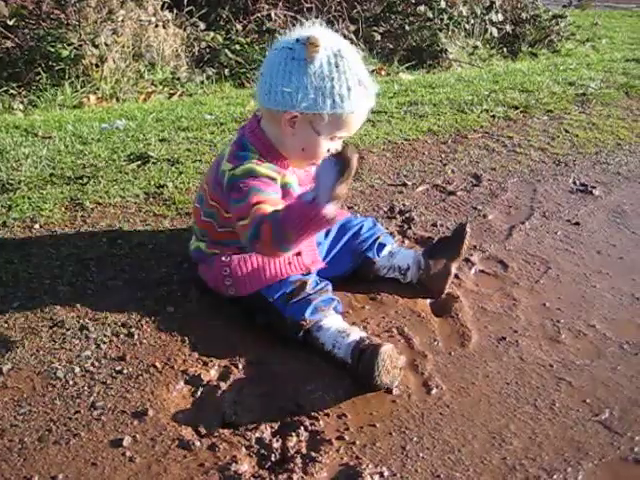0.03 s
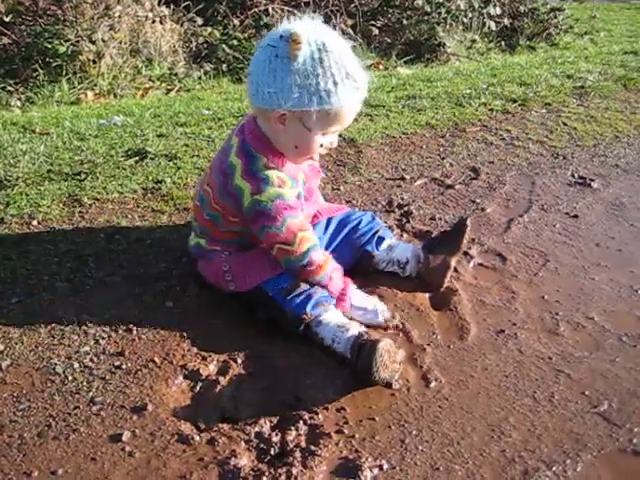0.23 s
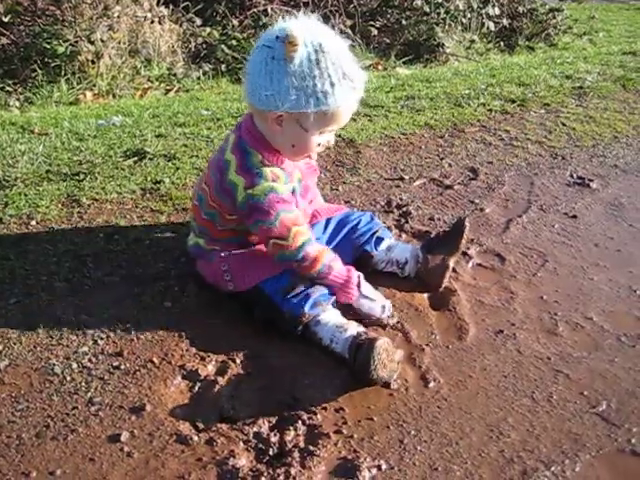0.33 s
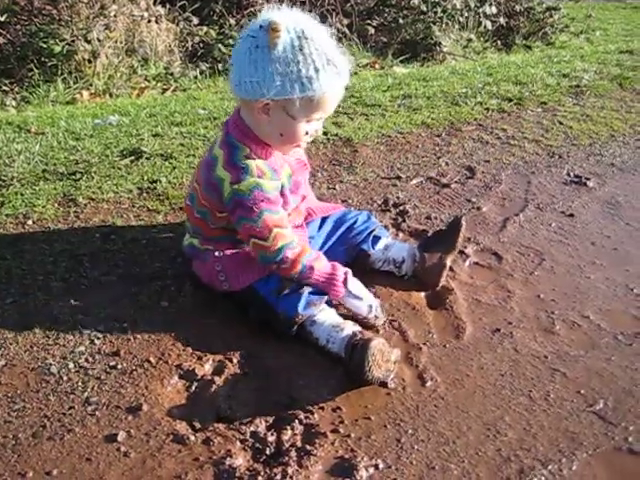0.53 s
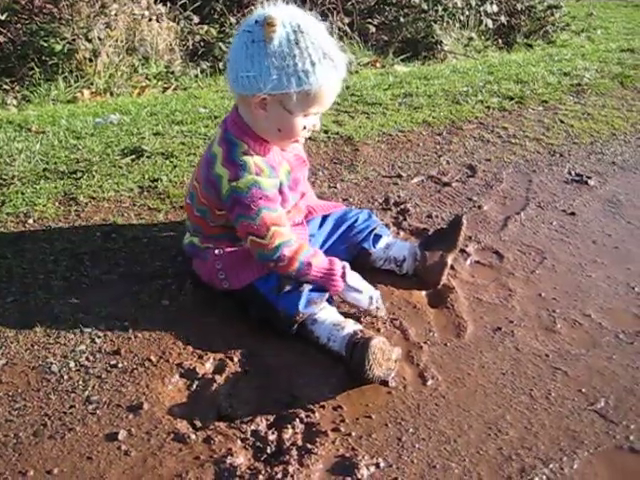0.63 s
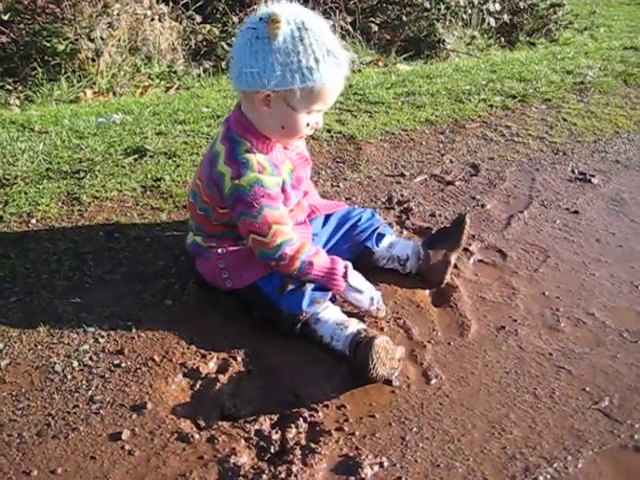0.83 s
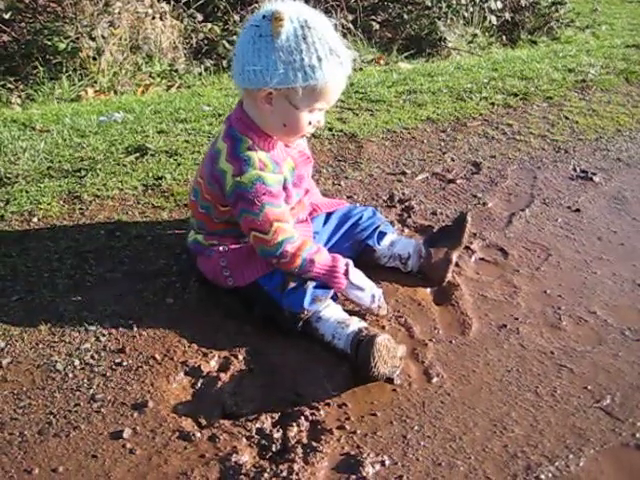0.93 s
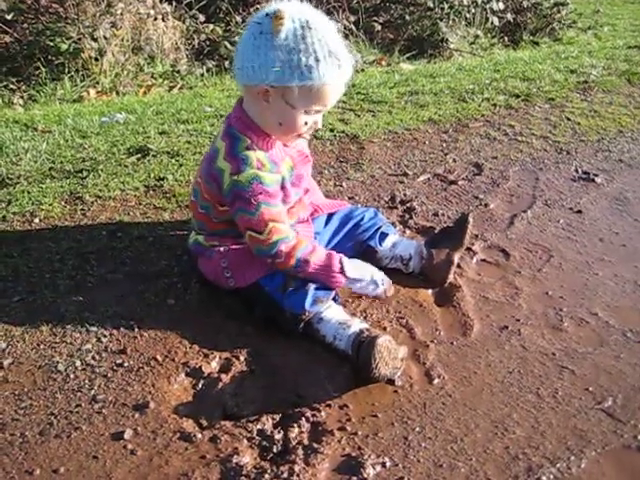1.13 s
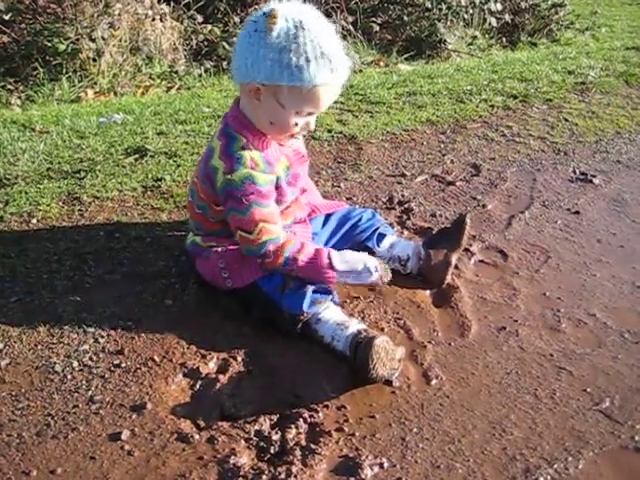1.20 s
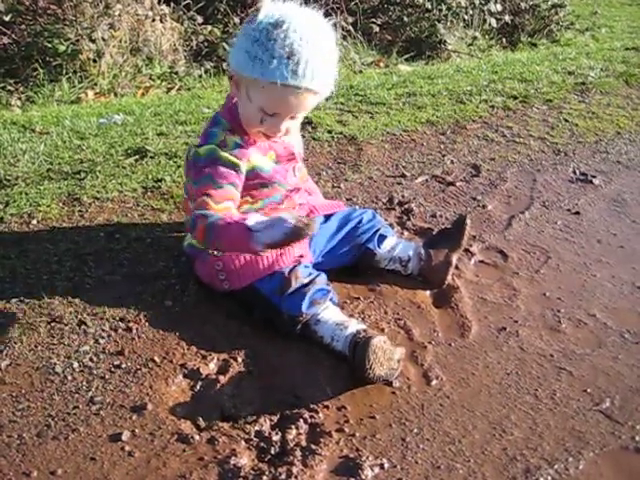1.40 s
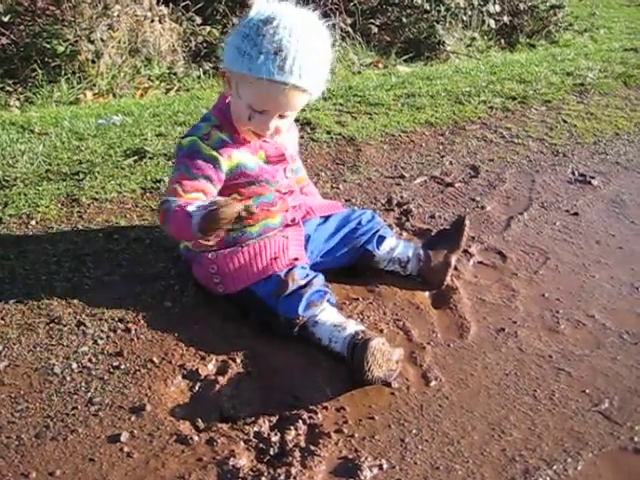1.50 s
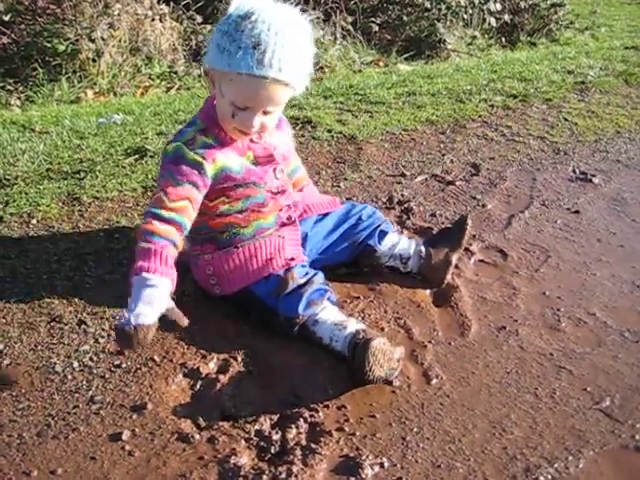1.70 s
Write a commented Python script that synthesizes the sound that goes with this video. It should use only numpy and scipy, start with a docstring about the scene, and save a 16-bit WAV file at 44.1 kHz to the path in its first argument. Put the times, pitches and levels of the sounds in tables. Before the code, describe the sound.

One short, wet slap on mud comes near the start, heard nearby in the open air, followed by a tiny plop and a few drips. A wool sleeve brushes quietly as the arm moves, with light wind and a low hum behind.

```python
"""A slap in wet mud

A small hand slaps wet mud once, outdoors: water cracks out from under the palm and trapped air pops.
A flung clod plops down, droplets tick around it, and a knitted sleeve rustles as the arm moves.
Behind it lie faint wind, a low steady hum and the camera's hiss and thin whine."""
import sys
import numpy as np
from scipy import signal
from scipy.fft import rfft, irfft
from scipy.io import wavfile
from scipy.ndimage import uniform_filter1d

SR = 44100
rng = np.random.default_rng(int(sys.argv[2]) if len(sys.argv) > 2 else 0)


def transcribe(u):
    """Save the signal u as a 16-bit wav file named by the first command-line argument.

    u: samples, shape (n,) or (channels, n), limited to [-1, 1]; the rate is SR.
    q: integer samples, one column per channel.
    """
    v = np.clip(np.atleast_2d(u).T, -1, 1)
    q = np.round(v * 32767).astype(np.int16)
    wavfile.write(sys.argv[1], SR, q)


N = 77175
T = np.arange(N) / SR


def amp(db):
    """Decibels to gain."""
    return 10 ** (np.asarray(db) / 20)


def unit(x):
    """Scales to rms 1."""
    return x / np.sqrt(np.mean(x ** 2) + 1e-20)


def eq_db(curve, hz):
    """Level of an EQ curve at hz, interpolated on a log-frequency axis."""
    f, db = np.transpose(curve)
    return np.interp(np.log(hz + 1), np.log(f), db)


def add(mix, s, sound):
    """Mixes a sound in at time s."""
    part = mix[max(round(s * SR), 0):][:len(sound)]
    part += sound[:len(part)]


def colour(x, curve, tilt_db=0):
    """Minimum-phase EQ with unit power gain, tilted by tilt_db per octave."""
    hz = abs(np.fft.fftfreq(2048, 1 / SR))
    log_gain = np.log(amp(eq_db(curve, hz) + tilt_db * np.log2(hz + 1)))
    response = np.exp(np.conj(signal.hilbert(log_gain)))
    taps = np.fft.ifft(response).real[:len(hz) // 2]
    return signal.fftconvolve(x, taps / np.linalg.norm(taps))[:len(x)]


def resonate(x, hz, width_hz):
    """A steep band-pass: two resonant stages, each width_hz wide."""
    carrier = np.exp(2j * np.pi * hz * T[:len(x)])
    pole = np.exp(-np.pi * width_hz / SR)
    return (carrier * signal.lfilter([(1 - pole) ** 2], [1, -2 * pole, pole ** 2], x / carrier)).real


def drift(rate_hz):
    """A random wander with rms 1, mostly slower than rate_hz."""
    hz = np.fft.rfftfreq(N, 1 / SR)
    return unit(irfft(rfft(rng.standard_normal(N)) * (hz > 0) / (1 + (hz / rate_hz) ** 4), N))


def grains(per_s, spread_db):
    """A crackle of random clicks of uneven size, with rms 1."""
    size = amp(spread_db * np.minimum(rng.exponential(1, N), 4))
    return unit(size * rng.choice([-1, 1], N) * (rng.random(N) < per_s / SR))


def pop(hz, db, t60, rise_s):
    """A cavity in the mud pulses for a few cycles; its change of volume is what radiates."""
    t = T[:SR // 20]
    volume = amp(db - 60 * t / t60) * (1 - np.exp(-t / rise_s)) * np.sin(2 * np.pi * hz * t)
    return np.diff(volume, prepend=0) * SR / (2 * np.pi * hz)


def burst(hold_s, t60):
    """A short spray of noise, evened out in spectrum, with the energy of its envelope."""
    t = T[:SR // 20]
    envelope = amp(-60 * np.maximum(t - hold_s, 0) / t60)
    spectrum = rfft(envelope * rng.standard_normal(len(t)))
    contour = np.sqrt(uniform_filter1d(abs(spectrum) ** 2, size=40) + 1e-12)
    spray = irfft(spectrum / contour, len(t)) * np.sqrt(envelope)
    return spray * np.linalg.norm(envelope) / np.linalg.norm(spray)


def air():
    """A bed of open air and camera hiss, with faint patches drifting through its spectrum."""
    # tone of the bed: f/Hz, relative level/dB
    air_eq = [(25, -33), (60, 3), (130, 0.5), (220, 0), (350, -7), (550, -4), (820, 0.5), (1100, -4.5),
              (1500, -8), (2200, -14.5), (3500, -17.5), (6000, -21), (9000, -24.5), (11000, -22),
              (12600, -29.5), (15000, -18), (16000, -23.5)]
    level_db, patch_db = -42.5, 0.78
    frames = dict(nperseg=1024, noverlap=768)
    hz, _, noise = signal.stft(rng.standard_normal(N), SR, **frames)
    patches = uniform_filter1d(rng.standard_normal(noise.shape), size=10, axis=0)
    patches = unit(uniform_filter1d(patches, size=12, axis=1))
    gain = amp(eq_db(air_eq, hz)[:, None] + patch_db * patches)
    _, bed = signal.istft(noise * gain, **frames)
    return amp(level_db) * unit(bed[:N])


def wind():
    """Soft gusts in the bushes: bands of noise that swell and fade."""
    # gusts: peak t/s, half length/s, level/dB, f/Hz
    gusts = [(0.863, 0.18, -54.5, 1520), (1.154, 0.037, -46.5, 1360)]
    out = np.zeros(N)
    for s, half_s, db, hz in gusts:
        swell = np.exp(-.5 * ((T - s) / half_s) ** 2)
        out += amp(db) * swell * unit(resonate(rng.standard_normal(N), hz, width_hz=570))
    return out


def hum():
    """A wavering low hum, like a far engine; its octave swells and fades on its own."""
    # path of the fundamental: t/s, f/Hz, rms level/dB
    fundamental_path = [(0, 93.9, -49.5), (.3, 93.73, -47.5), (.65, 93.15, -45.5), (.8, 93.4, -46),
                        (.89, 93.93, -42), (1.2, 94.1, -45), (1.3, 94.55, -42.5), (1.42, 94.6, -45.5),
                        (1.75, 95.3, -45.5)]
    # fader of the octave: t/s, rms level/dB
    octave_fader = [(0, -58.5), (.15, -46.5), (.24, -54.5), (.35, -63), (.47, -55), (.59, -46.5),
                    (.82, -58.5), (.95, -53.5), (1.07, -48.5), (1.2, -57), (1.33, -58), (1.43, -63),
                    (1.56, -53.5), (1.75, -63)]
    waver_hz, waver_db = 0.75, 1.13
    s, hz, db = np.transpose(fundamental_path)
    pitch = np.interp(T, s, hz) + waver_hz * drift(rate_hz=6)
    phase = 2 * np.pi * np.cumsum(pitch) / SR
    fundamental = amp(np.interp(T, s, db) + waver_db * drift(rate_hz=9.6)) * np.sin(phase)
    octave = amp(np.interp(T, *np.transpose(octave_fader))) * np.sin(2 * phase)
    return np.sqrt(2) * (fundamental + octave)


def whine():
    """The camera's thin whine: two high tones with a slight jitter in pitch."""
    # tones: f/Hz, rms level/dB
    tones = [(7560, -65), (15120, -80)]
    jitter_hz = 12
    out = np.zeros(N)
    for hz, db in tones:
        pitch = hz + jitter_hz * drift(rate_hz=30)
        out += amp(db) * np.sin(2 * np.pi * np.cumsum(pitch) / SR)
    return np.sqrt(2) * out


def sleeve():
    """Wool fibres catch and slip, swelling with each move of the arm; each rub has its own pitch."""
    # arm moves: peak t/s, rise/s, fall/s, level/dB, rub f/Hz, rub width/Hz, rub gain against the fibres
    strokes = [(.095, 0.045, 0.042, -46, 3400, 1500, .8), (.38, 0.13, .13, -50, 3670, 1800, 0.38),
               (1.19, 0.063, 0.054, -49, 3600, 1800, 0.45), (1.258, .03, 0.024, -46, 3150, 900, 0.94),
               (1.385, 0.047, 0.12, -50.5, 4030, 700, 1.1), (1.66, 0.23, 0.16, -54, 3100, 1500, 0.27)]
    # tone of the wool: f/Hz, relative level/dB
    wool_eq = [(300, -21), (1200, -7.5), (2200, -6), (3000, 2), (4300, -0.5), (5300, -4), (6000, 0),
               (6900, -8), (7700, -4.5), (8600, -9), (10000, -4.5), (11300, -9.5), (12800, -14.5),
               (16000, -15.5)]
    fibres_per_s = 5500
    out = np.zeros(N)
    for s, rise_s, fall_s, db, hz, width_hz, rub_gain in strokes:
        fibres = colour(grains(fibres_per_s, spread_db=2.5), wool_eq)
        rub = unit(resonate(grains(fibres_per_s, spread_db=3.5), hz, width_hz))
        swell = np.exp(-.5 * ((T - s) / np.where(T < s, rise_s, fall_s)) ** 2)
        out += amp(db) * swell * unit(fibres + rub_gain * rub)
    return out


def droplets():
    """Small drops and crumbs tick, each a tiny burst of noise through a resonance."""
    # ticks: t/s, level/dB, f/Hz, burst t60/s
    ticks = [(.0985, -36, 4300, .008), (0.2142, -36.5, 3420, .008), (.2412, -37, 3700, 0.0081),
             (0.268, -43, 12500, .006), (.2936, -41, 13000, .006), (0.3425, -37, 4070, 0.007),
             (.3610, -38, 5300, .014), (.3642, -40, 8600, .012), (.3660, -39, 10000, .008),
             (0.3918, -44, 8660, .008), (.4055, -44, 12000, .008), (0.5753, -45, 10000, .008),
             (.5870, -42, 4500, .014), (.9958, -50, 6410, .005), (.9960, -46, 11000, .005),
             (1.396, -43, 6250, 0.011)]
    out = np.zeros(N)
    for s, db, hz, t60 in ticks:
        spray = burst(hold_s=0.00043, t60=t60)
        tick = unit(resonate(spray, hz, width_hz=.34 * hz))
        add(out, s, amp(db) * spray.std() * tick)
    return out


def clod():
    """One clod lands with a click and a plop, then slumps with a softer copy of both."""
    # pops of the landing: f/Hz, level/dB, t60/s, rise/s, lag after landing/s
    plops = [(3450, -8, 0.0027, 0.00042, 0.00029), (5400, -24, 0.0018, .0002, 0.0041),
             (1060, 4, .0034, 0.0012, .00025)]
    landing_s, slump_lag_s, slump_db = .29615, 0.00353, -18
    out = np.zeros(N)
    for hz, db, t60, rise_s, lag_s in plops:
        plop = pop(hz, db, t60, rise_s)
        add(out, landing_s + lag_s, plop)
        add(out, landing_s + lag_s + slump_lag_s, amp(slump_db) * plop)
    return out


def slap():
    """Palm and fingers land within milliseconds: water cracks out, air pops, the mud gives and fizzes."""
    # parts of the hand meeting the mud: t/s, level/dB, hold/s, burst t60/s, tilt/(dB per octave)
    contacts = [(.2455, -13.5, 0.0012, 0.0043, 1), (0.2488, -18, 0.0016, 0.0098, 0),
                (0.2531, -22.5, 0.00068, 0.0065, -4), (.2565, -17.5, 0.0013, .0055, 1.5)]
    # tone of the wet splat: f/Hz, relative level/dB
    splat_eq = [(100, -23), (600, -15), (1000, -21), (1300, 2.5), (1900, -1), (2300, -5.5), (2800, 3.5),
                (3900, 4), (5200, -1), (6700, -5), (7500, -1), (8200, -4.5), (9200, 1.5), (10500, -5.5),
                (11800, -3), (13200, -9.5), (16000, -19)]
    # air pockets bursting under the hand: t/s, f/Hz, level/dB, t60/s
    pockets = [(.2460, 3120, 1, 0.0035), (.2460, 1460, -10.5, 0.0079), (0.2467, 4590, -3, 0.0023),
               (0.2483, 1840, -14, .009), (0.2493, 3600, -13, 0.0044), (0.2514, 1290, -20, 0.0072),
               (.2569, 5230, -9, 0.0053), (.2570, 3900, -12, 0.0062), (.2570, 1970, -15.5, 0.0084)]
    fizz_db, fizz_t60_s = -41, 0.29  # the wet tail as the mud settles
    thud_db, thud_t60_s = -48, .03  # the soft push of the palm
    out = np.zeros(N)
    for s, db, hold_s, t60, tilt_db in contacts:
        add(out, s, amp(db) * colour(burst(hold_s, t60), splat_eq, tilt_db))
    for s, hz, db, t60 in pockets:
        add(out, s, pop(hz, db, t60, rise_s=0.00012))
    fizz = colour(grains(per_s=8600, spread_db=3), splat_eq)
    fizz *= amp(fizz_db - 60 * T / fizz_t60_s)
    thud = unit(resonate(rng.standard_normal(N), hz=380, width_hz=150))
    thud *= amp(thud_db - 60 * T / thud_t60_s)
    first_touch_s = contacts[0][0]
    add(out, first_touch_s, fizz + thud)
    return out


def scene():
    """All layers in mono, the same in both channels."""
    mix = slap() + clod() + droplets() + sleeve() + air() + wind() + hum() + whine()
    return np.tile(mix, (2, 1))


def record(dry):
    """A steep low-pass trims the very top of the treble."""
    cutoff_hz = 15850
    low_pass = signal.firwin(511, cutoff_hz, window=("kaiser", 9), fs=SR)
    return signal.oaconvolve(dry, low_pass[None], "same")


dry = scene()
out = record(dry)
transcribe(out)
```